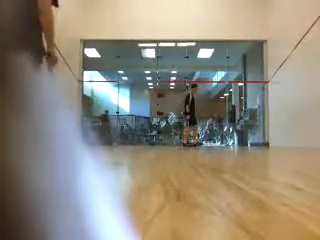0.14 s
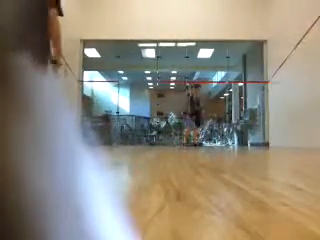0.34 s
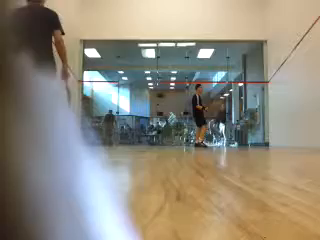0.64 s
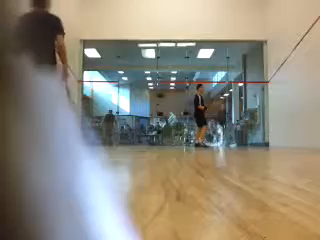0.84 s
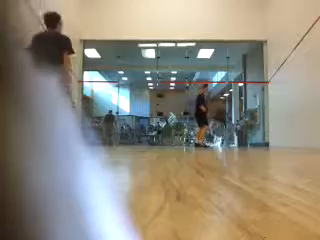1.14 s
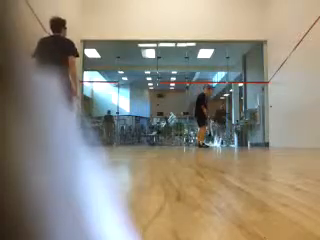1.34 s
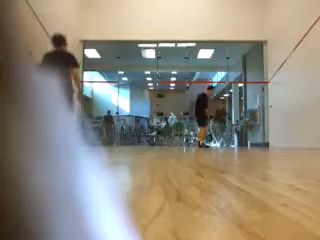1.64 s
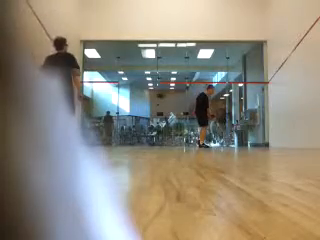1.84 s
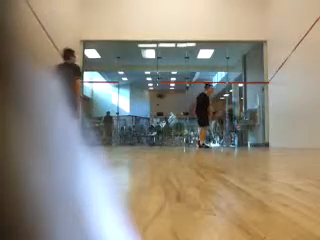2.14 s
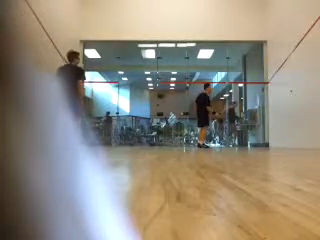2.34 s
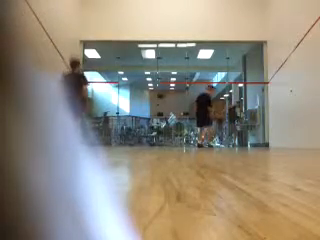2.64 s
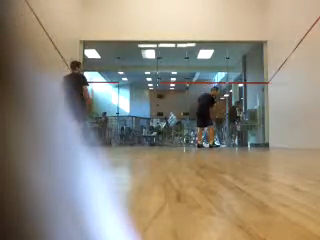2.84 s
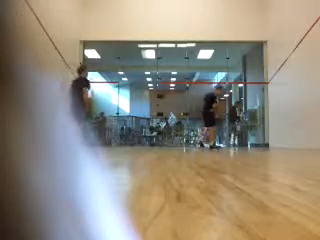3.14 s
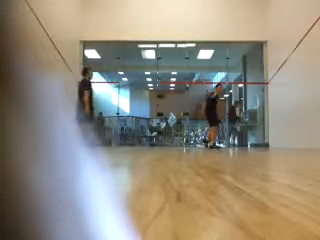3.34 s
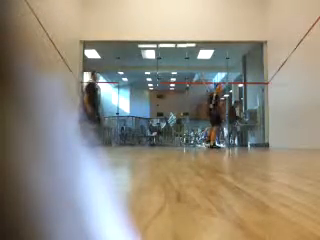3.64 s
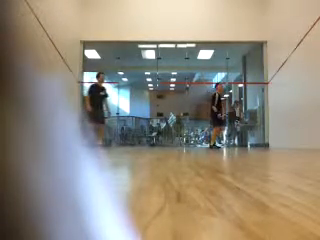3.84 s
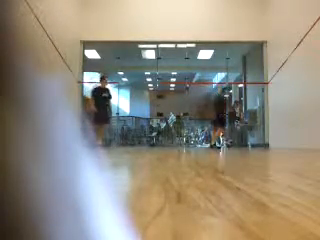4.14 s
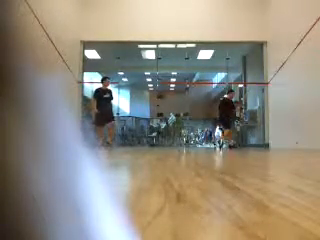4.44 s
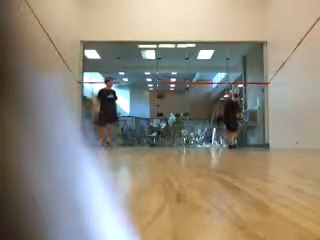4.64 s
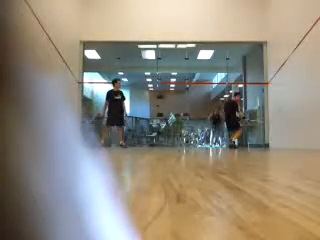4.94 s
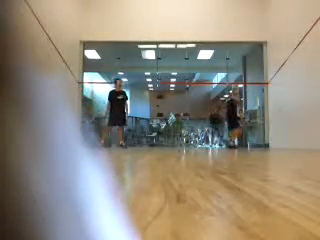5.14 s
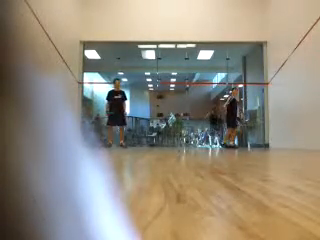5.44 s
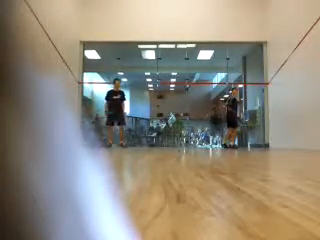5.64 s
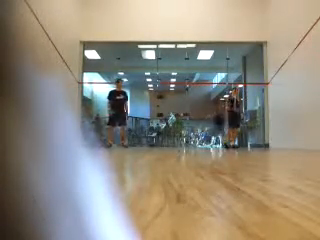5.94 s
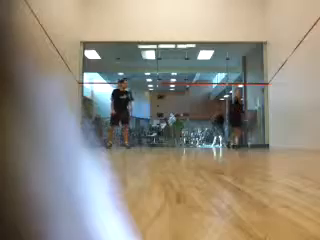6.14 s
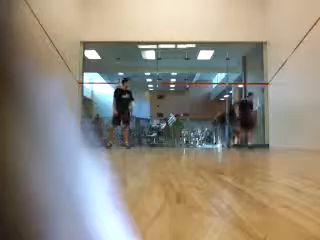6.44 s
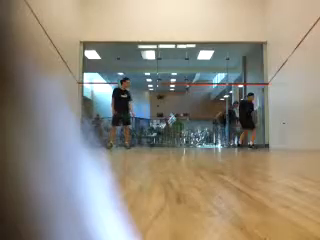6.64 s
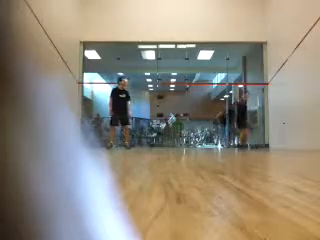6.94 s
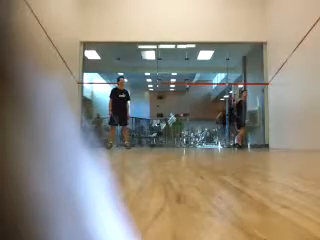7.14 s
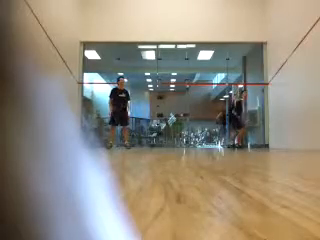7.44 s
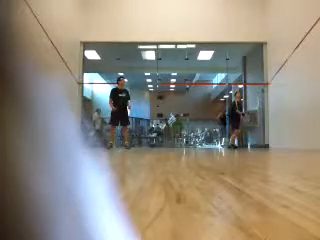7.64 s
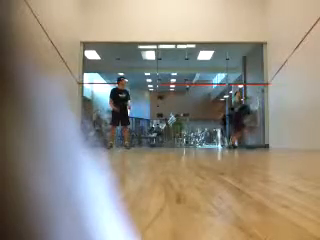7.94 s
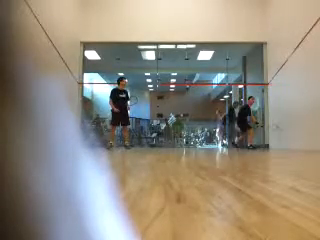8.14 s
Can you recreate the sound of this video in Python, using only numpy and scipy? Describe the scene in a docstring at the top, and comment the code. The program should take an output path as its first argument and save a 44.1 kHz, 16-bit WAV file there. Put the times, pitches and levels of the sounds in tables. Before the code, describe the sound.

Three loud, booming smacks of a squash ball hit the wall beside a microphone on the floor, each distorting briefly and leaving a long echo. A bounce on the boards and a racquet pop from the far end lead into every one. Before these shots, slow footsteps thud away across the wooden floor with a brief high squeak, over the steady rush of ventilation in the enclosed court.

```python
"""A squash ball smacks the front wall of a hard, echoing court, heard from the floor by that wall.
Each smack booms the panel, overloads the microphone and rings for seconds. One player walks back with
thudding steps and squeaking soles; the other drives the ball three times from the far end, a racquet
pop before each smack. The ball bounces on the boards before each stroke. Ventilation rushes
throughout, and a faint hollow swell rises once."""
import sys
import numpy as np
from scipy import signal
from scipy.fft import rfft, irfft, next_fast_len
from scipy.io import wavfile
from scipy.ndimage import uniform_filter1d

SR = 44100
rng = np.random.default_rng(int(sys.argv[2]) if len(sys.argv) > 2 else 0)


def to_wav(sig):
    """Store sig (one row per channel, or 1-D mono) as 16-bit WAV at the path in sys.argv[1].

    Samples outside -1..1 are clipped; the rate is SR.
    """
    pcm = np.clip(np.atleast_2d(sig), -1, 1) * 32767
    pcm = np.round(pcm).astype(np.int16)
    wavfile.write(sys.argv[1], SR, pcm.T)  # frames by channels


N = 366030


def from_db(db):
    """Decibels to gain."""
    return np.exp(np.asarray(db) * np.log(10) / 20)


def at_hz(points, hz):
    """Read a table on a log-frequency axis."""
    known_hz, values = np.transpose(points)
    return np.interp(np.log(np.maximum(hz, 1)), np.log(known_hz), values)


def unit_energy(x):
    """Scale to an energy of one."""
    return x / np.sqrt(np.sum(x ** 2) + 1e-20)


def add(out, start_s, sound):
    """Mix a sound in, dropping what falls outside the scene."""
    start = round(start_s * SR)
    sound = sound[max(-start, 0):]
    start = max(start, 0)
    out[start:start + len(sound)] += sound[:N - start]


def coloured(x, colour):
    """Filter by a curve of (Hz, dB) points."""
    size = next_fast_len(len(x), True)
    gain = from_db(at_hz(colour, np.fft.rfftfreq(size, 1 / SR)))
    return irfft(rfft(x, size) * gain, size)[:len(x)]


def contact(colour, tilt_db_per_oct=0, edge_hz=6900, fall_db_per_oct=75, size=4096):
    """A minimum-phase knock, too slow to excite much above edge_hz."""
    hz = np.fft.rfftfreq(size, 1 / SR) + 1
    db = at_hz(colour, hz) + tilt_db_per_oct * np.log2(hz + 20)
    db -= fall_db_per_oct * np.log2(np.maximum(hz / edge_hz, 1))
    cepstrum = irfft(np.log(from_db(db)))
    causal = 2 * cepstrum[:size // 2] * (np.arange(size // 2) > 0)
    return unit_energy(irfft(np.exp(rfft(causal, size))))


def burst(t60_s, size=4096):
    """Exponentially decaying noise."""
    t = np.arange(size) / SR
    return unit_energy(rng.standard_normal(size) * from_db(-60 * t / t60_s))


# Each row: delay in seconds, level in dB against the direct sound.
ECHOES = [(.0165, 0), (.026, -5), (.047, -5), (.0555, .5)]

def first_echoes(scatter_s):
    """Direct sound plus smeared returns off side walls, ceiling and glass back wall."""
    out = np.zeros(SR // 4)
    for delay_s, db in [(0, 0)] + ECHOES:
        add(out, delay_s, from_db(db) * burst(scatter_s))
    return out


# Each row: frequency in Hz, reverberation time in seconds.
COURT_T60 = [(60, 1.8), (180, 2.4), (380, 4.0), (800, 4.3), (1300, 4.0), (2800, 3.1), (4500, 2.5),
             (6500, 2.0)]

def court(direct_db, build_s, scatter_s, length=4 * SR, frame=512):
    """Room response: first echoes, then a diffuse tail that builds up and dies by band."""
    hz = np.fft.rfftfreq(frame, 1 / SR)
    t = np.arange(0, length + frame, frame // 2) / SR
    noise = rng.standard_normal((len(hz), 2 * len(t))).view(complex)
    decay = from_db(-60 * t / at_hz(COURT_T60, hz)[:, None])
    tail = signal.istft(noise * decay, SR, nperseg=frame)[1][:length]
    response = unit_energy(tail * np.tanh(np.arange(length) / SR / build_s))
    add(response, 0, from_db(direct_db) * first_echoes(scatter_s))
    return response


def ball_ping(hz, t60_s, swell_s):
    """The hollow ball rings as it squashes and springs back."""
    t = np.arange(SR // 4) / SR
    envelope = from_db(-60 * t / t60_s) * (1 - np.exp(-t / swell_s)) ** 2
    return unit_energy(np.sin(2 * np.pi * hz * t) * envelope)


# Spectrum of a slap on a hard surface. Each row: frequency in Hz, level in dB.
SLAP_COLOUR = [(60, -2), (250, 3), (420, 4), (640, 1), (900, -6), (1250, -1), (1650, 3), (2200, -8),
               (2800, -11), (4000, -8), (5400, -4.5), (7000, -8)]

def crack(tilt_db_per_oct, scatter_s):
    """A hard click with its first echoes."""
    return signal.fftconvolve(contact(SLAP_COLOUR, tilt_db_per_oct), first_echoes(scatter_s))


def boom(hz, t60_s, spread):
    """A large wooden panel: a crowd of low modes around one pitch."""
    band = signal.butter(2, [hz / (1 + spread), hz * (1 + spread)], "band", fs=SR, output="sos")
    return unit_energy(signal.sosfilt(band, burst(t60_s, size=32768)))


# Spectrum of the ball on the wall. Each row: frequency in Hz, level in dB.
SMACK_COLOUR = [(40, -13), (125, -15), (220, .3), (275, -4.5), (350, 3), (430, 3.5), (540, -2.5),
                (650, -2.5), (830, -8.5), (1230, -1.5), (1420, -6), (1650, -6.5), (2200, -18.5),
                (2900, -22.5), (4200, -21.5), (5400, -15.5)]
# Each row: start in seconds, relative level in dB, panel pitch in Hz. The first only leaves its tail.
SMACKS = [(-1.25, 28.3, 150), (3.592, 28.9, 180), (5.436, 28.6, 190), (7.218, 29.7, 128)]

def wall_smacks(room_db=4.9, ping_db=-5.5, crack_db=-14, boom_db=1):
    """Close by, the ball pings and cracks, the wall booms and the court rings."""
    out = np.zeros(N)
    for start_s, db, panel_hz in SMACKS:
        room = court(direct_db=-16, build_s=.08, scatter_s=.025)
        smack = signal.oaconvolve(contact(SMACK_COLOUR, tilt_db_per_oct=.05), room)
        add(out, start_s + .002, from_db(db + room_db) * smack)
        add(out, start_s - .0007, from_db(db + ping_db) * ball_ping(hz=1250, t60_s=.02, swell_s=.004))
        add(out, start_s + .002, from_db(db + crack_db) * crack(tilt_db_per_oct=4, scatter_s=.012))
        boom_gain = from_db(db + boom_db) * panel_hz / 190  # radiates in proportion to pitch
        add(out, start_s + .004, boom_gain * boom(panel_hz, t60_s=.8, spread=.48))
    return out


# Each row: start in seconds, relative weight in dB, thud pitch in Hz, relative tick level in dB.
STEPS = [(-.45, 9.5, 240, -10), (.256, 10, 135, -4), (1.137, 9, 210, -8), (1.678, 7, 155, -8),
         (2.39, 7.5, 215, 1.5), (2.95, 5.5, 160, -4)]

def footsteps(thud_db=5.5, slap_db=.8, tick_db=-10, heel_db=-4, toe_lag_s=.026, fade_db_per_s=1.6):
    """Heel, then toe, slap and thud on the sprung floor; slaps fade as the walker slows and recedes."""
    slaps, near = np.zeros((2, N))
    lead_s = 1  # the court already rings at time zero
    for start_s, weight_db, thud_hz, crisp_db in STEPS:
        sole_db = weight_db + slap_db - fade_db_per_s * start_s
        for at_s, part_db in ((start_s, heel_db), (start_s + toe_lag_s, 0)):
            thud = boom(thud_hz, t60_s=.85, spread=.52)
            tick = crack(tilt_db_per_oct=3, scatter_s=.016)
            add(slaps, at_s + lead_s, from_db(sole_db + part_db) * contact(SLAP_COLOUR))
            add(near, at_s, from_db(weight_db + thud_db + part_db) * thud)
            add(near, at_s, from_db(crisp_db + tick_db + part_db) * tick)
    room = court(direct_db=-14, build_s=.008, scatter_s=.03)
    return near + signal.fftconvolve(slaps, room)[lead_s * SR:][:N]


# Each row: frequency in Hz, relative noise density in dB.
AIR_COLOUR = [(20, -14), (45, -9), (65, 1), (100, -5), (170, -5), (270, 1.5), (400, -1), (540, -10),
              (690, -6), (920, -15), (1520, -10), (2600, -31), (5200, -30), (6800, -36), (7600, -52)]

def ventilation(rms_db=-30):
    """A steady low rush of air fills the hall."""
    rush = coloured(rng.standard_normal(N), AIR_COLOUR)
    return from_db(rms_db) * np.sqrt(N) * unit_energy(rush)


# Each row: start and length in seconds, lowest pitch in Hz, initial pitch excess as a fraction,
# relative level in dB.
SQUEAKS = [(.909, .008, 4750, .12, -18), (.918, .019, 4420, .10, -7.7), (2.68, .16, 5260, .019, -49.5),
           (7.68, .1, 3870, .045, -35)]

def shoe_squeaks(grip_at=.27, rebound=.38, waver=.002, room_db=5, direct_db=-.3):
    """Rubber stick-slip: a whistle that drops in pitch, then climbs partway back as the sole grips."""
    out = np.zeros(N)
    for start_s, length_s, low_hz, excess, db in SQUEAKS:
        t = np.arange(int(length_s * SR)) / SR
        wobble = uniform_filter1d(rng.standard_normal(SR), size=100)
        glide = np.interp(t / length_s, [0, grip_at, 1], [1, 0, rebound])
        hz = low_hz * (1 + excess * glide) * (1 + waver * wobble[:len(t)] / wobble.std())
        envelope = np.tanh(t / .002) * np.tanh((length_s - t) / .003)
        add(out, start_s, from_db(db) * envelope * np.sin(2 * np.pi * np.cumsum(hz) / SR))
    room = court(direct_db=-22, build_s=.025, scatter_s=.01)
    return from_db(direct_db) * out + from_db(room_db) * signal.fftconvolve(out, room)[:N]


def low_swell(start_s=1.7, length_s=.8, from_hz=250, to_hz=410, half_width_hz=45, db=-29):
    """A dull, hollow rush swells briefly and climbs in pitch."""
    progress = np.linspace(0, 1, int(length_s * SR))
    lowpass = signal.butter(2, half_width_hz, fs=SR, output="sos")
    grain = signal.sosfilt(lowpass, rng.standard_normal((2, 2 * SR)))
    phase = 2 * np.pi * np.cumsum(from_hz + (to_hz - from_hz) * progress) / SR
    rush = np.sum(grain[:, :len(phase)] * [np.sin(phase), np.cos(phase)], axis=0) / grain.std()
    out = np.zeros(N)
    add(out, start_s, from_db(db) * rush * np.sin(np.pi * progress))
    return out


# Each row: start in seconds, relative tap level in dB, relative thud level in dB.
BOUNCES = [(2.958, 1.5, 0), (4.637, 2, 1.5), (6.443, 2.5, 11.5)]

def floor_bounces(slap_db=9, thud_db=6.5, tick_db=-12.5, thud_hz=185):
    """The ball taps the boards, which thud under it."""
    slaps, near = np.zeros((2, N))
    for start_s, tap_db, boards_db in BOUNCES:
        add(slaps, start_s + .008, from_db(tap_db + slap_db) * contact(SLAP_COLOUR))
        add(near, start_s + .01, from_db(boards_db + thud_db) * boom(thud_hz, t60_s=1.05, spread=.5))
        add(near, start_s, from_db(tap_db + tick_db) * crack(tilt_db_per_oct=3, scatter_s=.016))
    room = court(direct_db=-14, build_s=.015, scatter_s=.03)
    return near + signal.fftconvolve(slaps, room)[:N]


# Spectrum of the ball on the strings. Each row: frequency in Hz, level in dB.
STROKE_COLOUR = [(50, -16), (150, -11), (340, 8), (460, 6.5), (580, -4.5), (850, -4), (1200, -2.5),
                 (1430, -5), (1600, 2.5), (1900, -12), (2900, -18.5), (4000, -11.5), (6300, -8), (7200, -7)]
# Each row: start in seconds, relative level in dB, tilt in dB per octave.
STROKES = [(3.304, 9.5, .2), (5.114, 12, -.7), (6.885, 11, -.8)]

def racquet_strokes(pop_db=8.8, crack_db=-16):
    """The strings pop at the far end and arrive mostly as reverberation."""
    pops, cracks = np.zeros((2, N))
    for start_s, db, tilt_db_per_oct in STROKES:
        add(pops, start_s, from_db(db + pop_db) * contact(STROKE_COLOUR, tilt_db_per_oct))
        add(cracks, start_s + .01, from_db(db + crack_db) * crack(tilt_db_per_oct=-.5, scatter_s=.03))
    room = court(direct_db=-13, build_s=.018, scatter_s=.07)
    return cracks + signal.fftconvolve(pops, room)[:N]


def scene():
    """All sources summed to mono."""
    rally = wall_smacks() + racquet_strokes() + floor_bounces()
    return (rally + footsteps() + shoe_squeaks() + low_swell() + ventilation())[None]


# Dips and peaks of the microphone's port. Each row: centre in Hz, width in Hz, gain in dB.
MIC_PORT = [(900, 160, -2.2), (1830, 160, -1.2), (2820, 350, -5), (5200, 500, 3.2)]
# The microphone's dull top. Each row: frequency in Hz, gain in dB.
MIC_ROLLOFF = [(20, 0), (4500, -.3), (5400, -1.5), (6200, -8.5), (7000, -16.5), (8000, -27), (8800, -31)]

def record(dry, clip_level=.73, stopband_hz=9400):
    """The port colours the sound, the input clips on the smacks, and the treble is rolled off and cut."""
    hz = np.geomspace(20, 10000, 300)
    port_db = sum(db * np.exp(-2 * ((hz - centre_hz) / width_hz) ** 2)
                  for centre_hz, width_hz, db in MIC_PORT)
    at_input = coloured(dry[0], np.column_stack([hz, port_db]))
    clipped = np.clip(at_input, -clip_level, clip_level)
    lowpass = signal.cheby2(14, 60, stopband_hz, fs=SR, output="sos")
    return signal.sosfilt(lowpass, coloured(clipped, MIC_ROLLOFF))[None]


dry = scene()
out = record(dry)
to_wav(out)
```